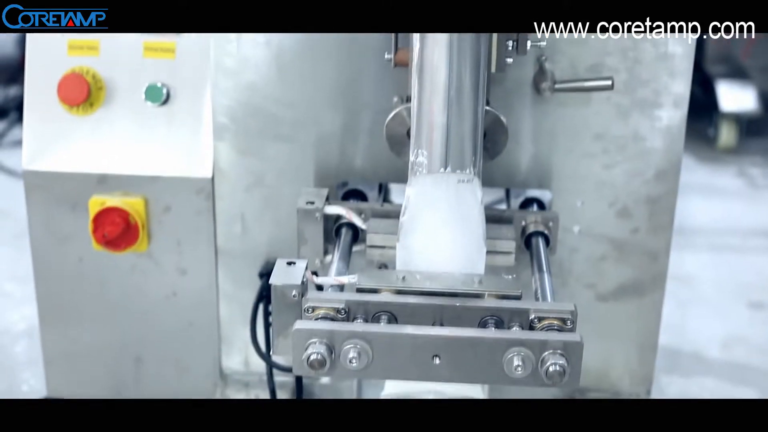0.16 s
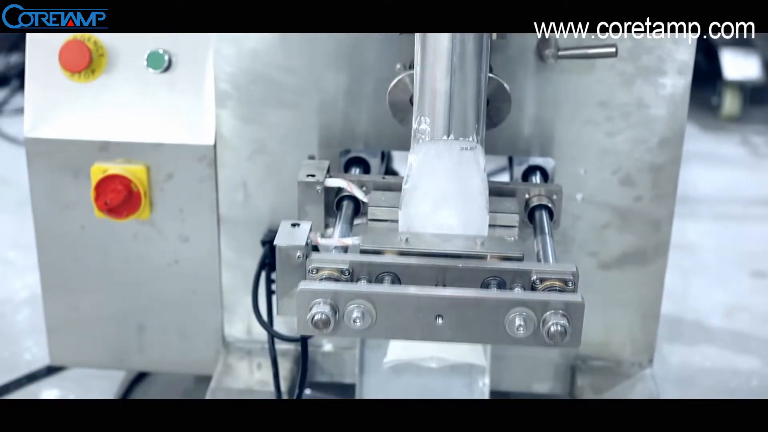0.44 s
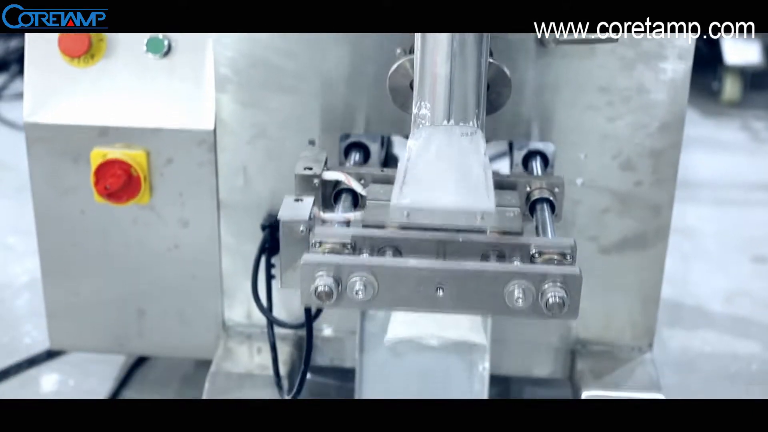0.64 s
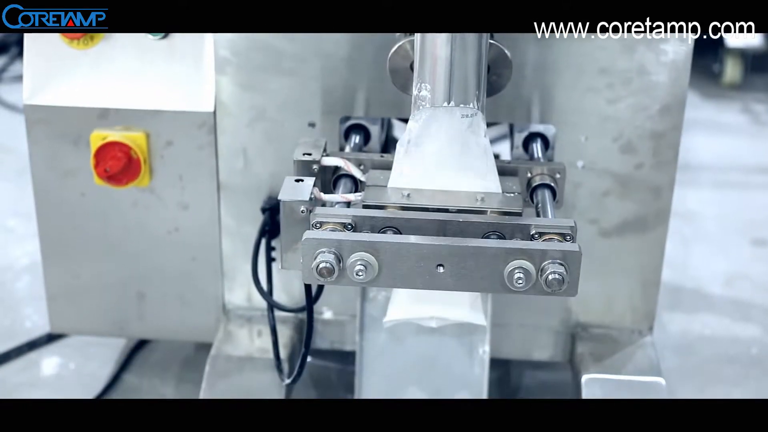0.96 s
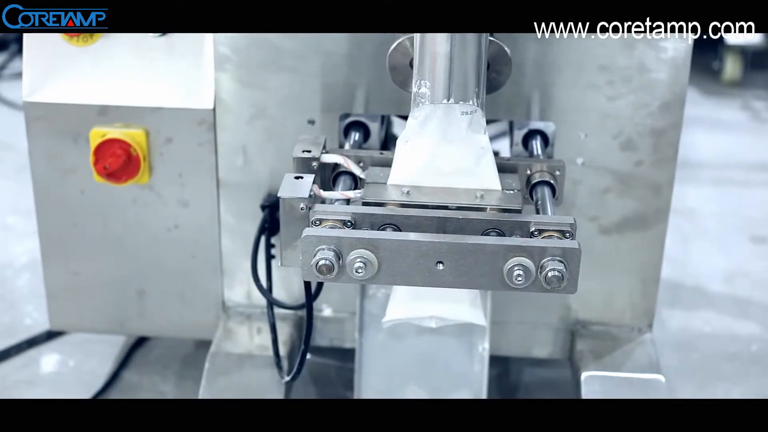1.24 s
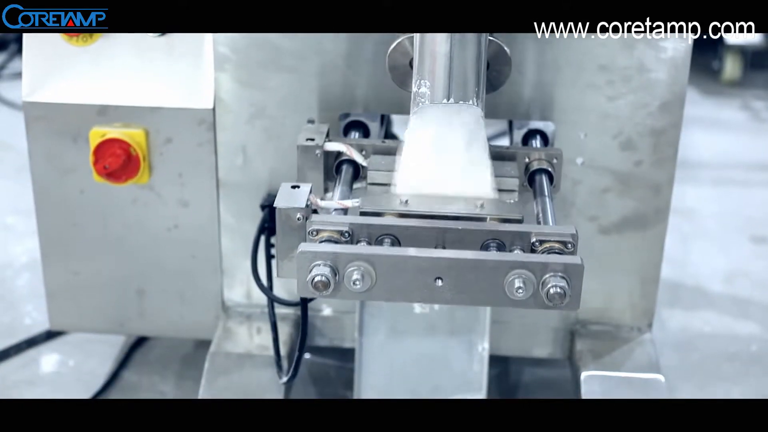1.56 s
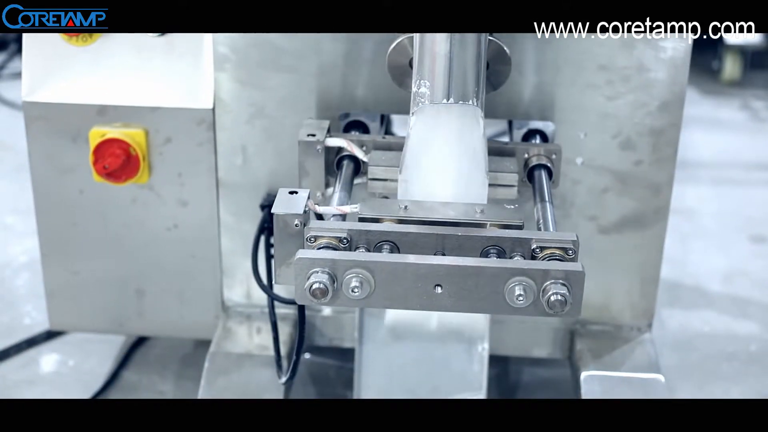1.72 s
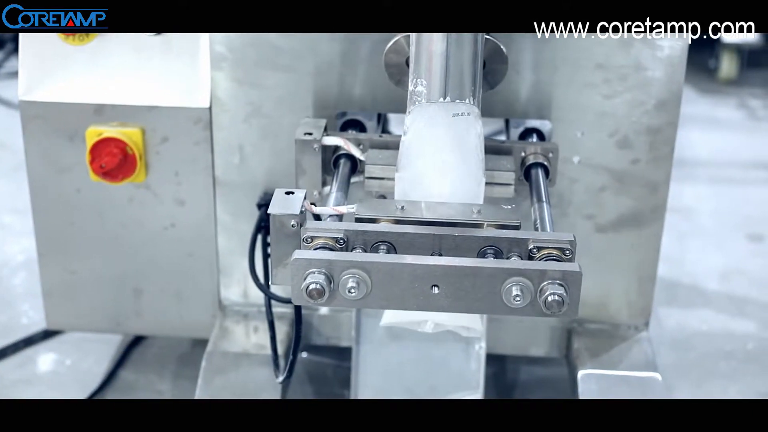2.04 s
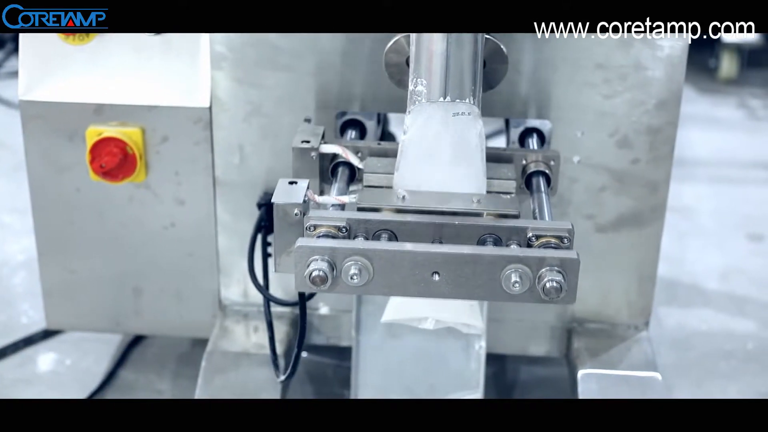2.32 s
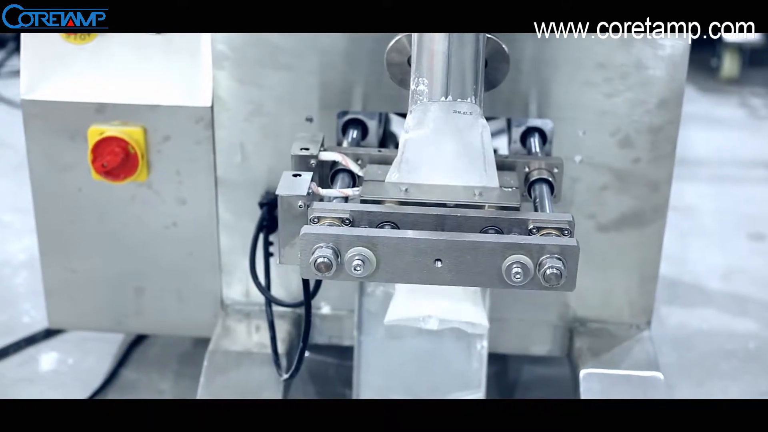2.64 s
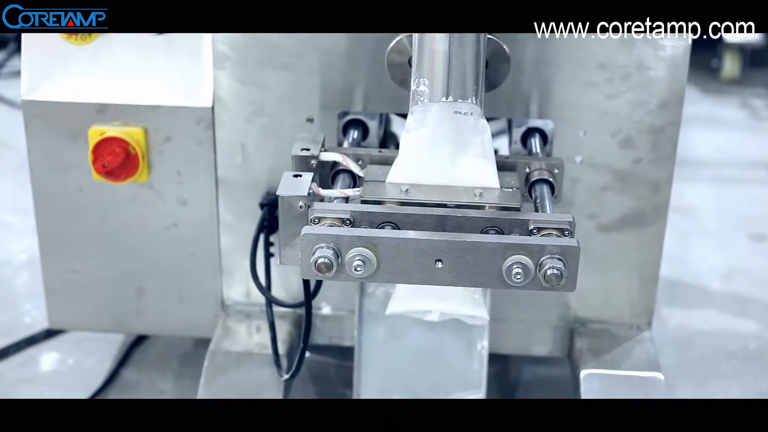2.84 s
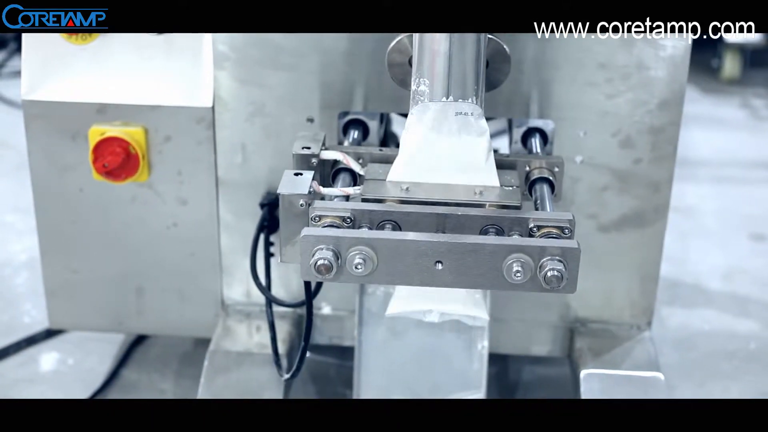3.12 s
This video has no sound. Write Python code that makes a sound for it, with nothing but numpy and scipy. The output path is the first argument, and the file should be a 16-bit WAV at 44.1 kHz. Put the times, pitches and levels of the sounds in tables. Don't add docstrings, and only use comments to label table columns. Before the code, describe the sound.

Packaging machine heard close by through a dull microphone: continuous low rumble, rattling slides, muffled clunks, faint air puffs, and a geared motor that spins up, holds, brakes, then starts again.

```python
import sys
import numpy as np
from scipy import signal
from scipy.fft import rfft, irfft, next_fast_len
from scipy.io import wavfile
from scipy.ndimage import uniform_filter1d

SR = 44100
rng = np.random.default_rng(int(sys.argv[2]) if len(sys.argv) > 2 else 0)


def wrap_up_sound(samples):
    columns = np.atleast_2d(samples).T
    tamed = np.clip(columns, -1, 1)
    steps = np.round(tamed * 32767).astype(np.int16)
    wavfile.write(sys.argv[1], SR, steps)


def magnitude_from_level(level_db):
    exponent = np.asarray(level_db, float) / 20
    return 10 ** exponent


N = 144648
T = np.arange(N) / SR

# (frequency [Hz], density [dB per Hz])
WASH_SPECTRUM = [(15, -13), (30, -16), (50, -6), (81, -1.5), (200, -9.5), (330, -13), (600, -24),
                 (2600, -54), (6000, -71)]
# (frequency [Hz], width [Hz], steady share [0-1])
ROOM_BOOMS = [(68, 8.9, .5), (91.06, 5, 0.51), (171.2, 14, .2), (336.3, 30, .1)]
# (time [s], level of each of the four booms [dB rms])
BOOM_DRIVES = [(0, -57, -47.5, -51, -56.5), (.55, -56.5, -46.5, -50, -53), (.75, -50.5, -51, -49.5, -52.5),
               (1.05, -42.5, -48.5, -51, -53), (1.4, -43.5, -47.5, -50, -53), (1.7, -42.5, -45, -50, -51.5),
               (1.95, -44, -45, -49, -52.5), (2.2, -43, -41.5, -50.5, -59.5), (2.45, -51, -41, -49, -54),
               (2.75, -42.5, -43, -49.5, -56.5), (3.28, -42.5, -41.5, -50.5, -53.5)]
# (frequency [Hz], density [dB per Hz])
WORK_SPECTRUM = [(60, -11), (150, -1.5), (330, 0), (480, -6), (600, -13), (980, -18), (1150, -26.5),
                 (3000, -44), (7000, -71)]
# (time [s], level [dB])
WORK_LOAD = [(0.0, -48.5), (0.04, -44), (0.1, -54), (0.33, -59.5), (0.6, -53), (0.61, -50), (0.7, -47),
             (1.13, -46), (1.62, -44.5), (1.8, -48), (1.82, -41.5), (1.84, -47.5), (1.95, -54), (2.35, -53),
             (2.37, -44.5), (2.38, -45.5), (3.13, -44), (3.28, -42.5)]
# (time [s], peak level [dB], body tone [Hz], rise [s], t60 [s])
BLOWS = [(0.038, -30, 345, 0.008, 0.11), (.575, -39, 94.7, 0.034, 0.51), (.63, -48.5, 636, 0.0077, 0.4),
         (.78, -43.5, 672, 0.0043, 0.058), (1.141, -29, 68, 0.015, 0.52), (1.418, -29.5, 234, .022, 0.11),
         (1.45, -32.5, 306.4, .015, 0.085), (1.545, -33, 270.5, 0.0063, .1),
         (1.82, -26.5, 347.8, 0.012, 0.063), (2.14, -49.5, 692, 0.016, .25), (.89, -46, 726, .02, 0.22),
         (2.352, -46, 638, 0.008, 0.25), (2.37, -59, 1248, .03, 0.48), (2.545, -42.5, 677, 0.0073, 0.16),
         (2.6, -37.5, 317, 0.0088, .12), (3.1, -29, 68, 0.028, .3), (1.49, -32.5, 74.5, .03, 0.26),
         (3.2, -31, 230.7, .022, 0.15), (3.232, -32, 310, 0.0061, 0.14), (.012, -42, 483, 0.0044, 0.089),
         (.03, -35, 185, 0.013, .12), (.045, -44.5, 848, .004, .06), (.77, -35.5, 329.4, .008, 0.088),
         (.888, -34.5, 193, 0.0077, 0.079), (.985, -37.5, 317, .008, .1), (1.118, -37, 399, .006, .08),
         (1.587, -32.5, 282, 0.0084, 0.11), (1.66, -34.5, 259, 0.0074, 0.11),
         (1.812, -35, 190.5, .01, 0.13), (1.817, -41, 520, 0.0032, 0.058),
         (2.487, -34.5, 241.3, .008, 0.11), (2.9, -41, 45.3, .04, .5), (.128, -46, 500, .003, .06),
         (2.528, -42, 500, .003, .06), (1.72, -37, 66, .05, .6), (3.024, -36, 270, 0.0083, 0.089),
         (3.1, -38, 37.8, .04, .5), (3.2, -33.5, 98, .03, 0.33)]
# (time [s], length [s], level [dB rms])
VALVE_PUFFS = [
    (0.023, 0.03, -72),
    (1.523, 0.033, -69.5),
    (1.575, 0.05, -64.5),
    (1.65, 0.065, -77.5),
    (1.7, 0.13, -75),
    (2.17, .015, -74.5),
    (2.379, 0.23, -74.5),
]
# (frequency [Hz], density [dB per Hz])
AIR_SPECTRUM = [(600, -15.5), (1200, 1.5), (2000, -4), (3000, -4.5), (5400, -14.5), (6500, -30.5),
                (8000, -45)]
# (full speed from [s], full speed until [s], shaft at its mark [s])
SERVO_RUNS = [
    (.93, 1.61, 1.237),
    (2.71, 3.4, 2.873),
]
GEAR_TONE_ORDERS = [29, 30, 32, 47, 49, 55, 56, 62, 64, 66, 68, 95, 103, 105, 113, 144, 176, 196, 201]
# (level [dB rms], fuzzy share [0-1])
GEAR_TONES = [(-54, 0.35), (-61.5, .3), (-63, .3), (-50.5, 0.037), (-59, .08), (-54.5, .02), (-61, .03),
              (-62, .15), (-67, 0.34), (-68, 0.26), (-69.5, 0.24), (-75, .3), (-76.5, .3), (-76, 0.33),
              (-76, 0.27), (-80.5, 0.34), (-84, .3), (-85, .2), (-86, .2)]
# (frequency [Hz], density [dB per Hz])
CLATTER_SPECTRUM = [(300, -29.5), (450, 0.5), (900, -5.5), (1200, -16), (3000, -36), (4000, -55)]
# (frequency [Hz], density [dB per Hz])
FIZZ_SPECTRUM = [(900, -20.5), (1300, 0), (1900, -3.5), (2200, -14.5), (3800, -21.5), (5000, -39.5)]
# (frequency [Hz], width [Hz], gain [dB])
CASING_RINGS = [(2400, 25, 15), (2690, 30, 10)]
# (from [s], end [s] (not used), whine change
# [dB])
DRIVE_COAST = (1.5, 1.6, -9)
# (time [s], level [dB], treble [dB])
DRY_TICKS = [
    (1.737, -70, -3),
    (2.092, -65, -24),
]
# (frequency [Hz], level [dB rms], on [s], off [s], change at rest [dB])
INVERTER_WHISTLES = [(4382, -95, 2.68, 3.2, -12), (6804, -88.5, 2.68, 3.02, -22),
                     (8204, -87, 2.61, 2.8, -13), (8236, -91, 2.4, 2.8, -10),
                     (13146, -89.5, 2.69, 2.99, -22)]


def evened(x):
    return x / np.sqrt(np.mean(x ** 2) + 1e-20)


def coloured(x, points):
    size = next_fast_len(len(x))
    hz = np.fft.rfftfreq(size, 1 / SR)
    f, db = np.transpose(points)
    gain = magnitude_from_level(np.interp(np.log(hz + 1), np.log(f + 1), db))
    return evened(irfft(rfft(x, size) * gain, size)[:len(x)])


def drift(top_hz):
    f, phase = np.geomspace(top_hz / 20, top_hz, num=16), rng.random(16)
    slow = np.sin(2 * np.pi * (f * T[::256, None] + phase)) @ f ** -.5
    return np.interp(T, T[::256], evened(slow))


def fuzzy(turns, width_hz):
    r = np.exp(-np.pi * width_hz / SR)
    noise = rng.standard_normal((2, N + SR))
    a, b = signal.lfilter([1], [1, -2 * r, r * r], noise)[:, SR:]
    return evened(a * np.cos(2 * np.pi * turns) + b * np.sin(2 * np.pi * turns))


def pure(turns):
    return np.sqrt(2) * np.sin(2 * np.pi * turns)


def add(mix, s, sound):
    part = mix[round(s * SR):][:len(sound)]
    part += sound[:len(part)]


def shaft():
    spin_up_per_s, brake_per_s, full_speed_hz = 4.5, 6.0, 14.888
    speeds = [1 - spin_up_per_s * np.maximum(start - T, 0) - brake_per_s * np.maximum(T - stop, 0)
              for start, stop, _ in SERVO_RUNS]
    speed = uniform_filter1d(np.clip(np.max(speeds, axis=0), 0, 1), size=900)
    turns = full_speed_hz * np.cumsum(speed) / SR
    turns_at_mark = np.interp(np.array(SERVO_RUNS).T[-1], T, turns)
    return speed, turns - turns_at_mark[np.argmax(speeds, axis=0)]


def rumble():
    wash_db, wash_wander_db, boom_swell_db = -41.5, 0.56, 0.8
    out = magnitude_from_level(wash_db + wash_wander_db * drift(4)) * coloured(rng.standard_normal(N), WASH_SPECTRUM)
    s, *drives = np.transpose(BOOM_DRIVES)
    for (hz, width_hz, share), db in zip(ROOM_BOOMS, drives):
        steady = pure(hz * T + 0.27 * drift(2.085))
        boom = share * steady + (1 - share) * fuzzy(hz * T, width_hz)
        out = out + magnitude_from_level(np.interp(T, s, db) + boom_swell_db * drift(2)) * boom
    return out


def mechanism(speed, turns):
    work_db, rattles_per_s, rattle_db = 5, 250, -5.5
    throb_depth, throb_lag_turns = 0.25, 0.3
    strength = magnitude_from_level(4 * np.minimum(rng.exponential(1, N), 4))
    struck = rng.random(N) < rattles_per_s / SR
    rattles = strength * struck * rng.choice([-1, 1], N)
    drive = rng.standard_normal(N) + magnitude_from_level(rattle_db) * evened(rattles)
    throb = 1 + throb_depth * speed * np.cos(2 * np.pi * (turns - throb_lag_turns))
    load_db = np.interp(T, *np.transpose(WORK_LOAD))
    return throb * magnitude_from_level(load_db + work_db) * coloured(drive, WORK_SPECTRUM)


def knocks():
    crack_db, crack_t60_s, crack_rise_s = -9.5, 0.098, 0.006
    out, t = np.zeros(N), T[:SR // 2]
    for s, db, hz, rise, t60 in BLOWS:
        swell = np.sin(np.pi / 2 * np.minimum(t / rise, 1)) ** 2
        fade = magnitude_from_level(-60 * np.maximum(t - rise, 0) / t60)
        body = swell * fade * np.sin(2 * np.pi * (hz * t + rng.random()))
        crack = coloured(rng.standard_normal(len(t)), WORK_SPECTRUM)
        crack *= np.minimum(t / crack_rise_s, 1) * magnitude_from_level(crack_db - 60 * t / crack_t60_s)
        add(out, s, magnitude_from_level(db) * (body + crack))
    return out


def valve():
    rise_s, tail_db_per_s = 0.0037, 400
    shape = np.zeros(N)
    for s, length, db in VALVE_PUFFS:
        tail_db = -tail_db_per_s * np.maximum(T - s - length, 0)
        shape += magnitude_from_level(db + tail_db) * np.clip((T - s) / rise_s, 0, 1)
    flutter = magnitude_from_level(1.2 * drift(80))
    return shape * flutter * coloured(rng.standard_normal(N), AIR_SPECTRUM)


def gears(turns):
    clatter_db, clatter_fade_db, fuzz_hz = -57, -10, 14
    place = np.arange(2962) / 2962
    burst = rng.standard_normal(len(place)) * magnitude_from_level(clatter_fade_db * place)
    out = magnitude_from_level(clatter_db) * np.interp(turns % 1, place, coloured(burst, CLATTER_SPECTRUM))
    for order, (db, share) in zip(GEAR_TONE_ORDERS, GEAR_TONES):
        tone = np.sqrt(1 - share) * pure(order * turns) + np.sqrt(share) * fuzzy(order * turns, fuzz_hz)
        out = out + magnitude_from_level(db) * tone
    return out


def drive_whine(speed, turns):
    order, whine_db, slow_db, fuzz = 200, -78, -30, 0.3
    whine = pure(order * turns) + fuzz * fuzzy(order * turns, 23)
    coasting = (T > DRIVE_COAST[0]) & (T < 2)
    whine *= magnitude_from_level(whine_db + slow_db * (1 - speed) + DRIVE_COAST[-1] * coasting)
    whine *= np.clip(5 * (speed - 0.62), 0, 1)
    rings = [magnitude_from_level(db) * signal.lfilter(*signal.iirpeak(hz, hz / width_hz, SR), whine)
             for hz, width_hz, db in CASING_RINGS]
    return whine + sum(rings)


def servo(speed, turns):
    slow_db, fizz_db = -71.5, -66
    gear_gain = magnitude_from_level(slow_db * (1 - uniform_filter1d(speed, size=3000)))
    fizz = speed * magnitude_from_level(fizz_db) * coloured(rng.standard_normal(N), FIZZ_SPECTRUM)
    return gears(turns) * gear_gain + drive_whine(speed, turns) + fizz


def ticks():
    out = np.zeros(N)
    click = 1. * (np.arange(256) == 128)
    for s, db, top_db in DRY_TICKS:
        spectrum = [(300, -20), (800, 0), (6400, top_db), (9000, -60)]
        add(out, s - .003, magnitude_from_level(db) * np.hanning(256) * coloured(click, spectrum))
    return out


def inverter():
    waver_db, width_hz = 2, 17
    out = np.zeros(N)
    for hz, db, on, off, rest_db in INVERTER_WHISTLES:
        resting = (T < on) | (T > off)
        level = db + uniform_filter1d(rest_db * resting * 1., size=800) + waver_db * drift(11)
        out += magnitude_from_level(level) * fuzzy(hz * T, width_hz)
    return out


def scene():
    speed, turns = shaft()
    machine = mechanism(speed, turns) + knocks() + valve() + servo(speed, turns)
    return (rumble() + machine + ticks() + inverter())[None]


def gate(x):
    gate_db, wander_db, follow, dead_zone_db = -98, 1.8, 0.45, -4
    z = signal.stft(x, window="cosine", nperseg=2048, noverlap=1024, boundary="even")[2][:, :1024]
    peak = abs(z).reshape(len(x), 128, 8, -1).max(axis=2)
    loud = peak[:, 3:12].mean(axis=1, keepdims=True)
    wander = .6 * rng.standard_normal(peak.shape[-1]) + 1.6 * rng.standard_normal(peak.shape)
    limit = magnitude_from_level(gate_db + wander_db * wander) * (loud / np.median(loud)) ** follow
    shut_block = np.repeat(peak < limit, 8, axis=1)
    faint_bin = abs(z) < magnitude_from_level(dead_zone_db) * np.repeat(limit, 8, axis=1)
    kept = np.pad(z * ~(shut_block | faint_bin), [(0, 0), (0, 1), (0, 0)])
    return signal.istft(kept, window="cosine", nperseg=2048, noverlap=1024)[1][:, :N]


def low_pass(x):
    return signal.sosfilt(signal.butter(12, 13400, fs=SR, output="sos"), x)


def record(dry):
    mix = gate(dry)
    return low_pass(mix)


dry = scene()
out = record(dry)
wrap_up_sound(out)
```